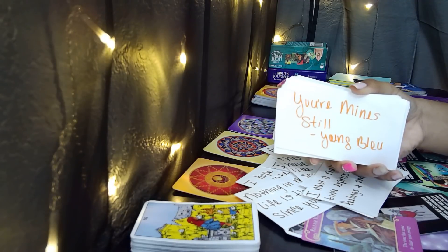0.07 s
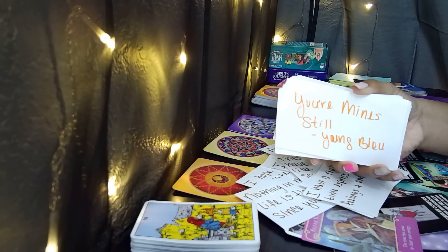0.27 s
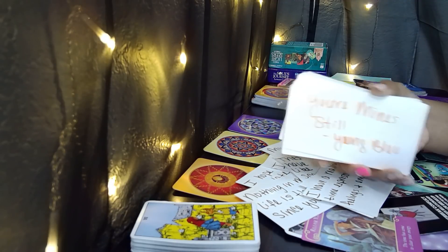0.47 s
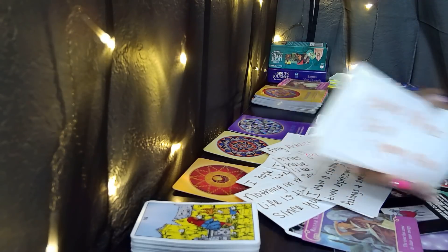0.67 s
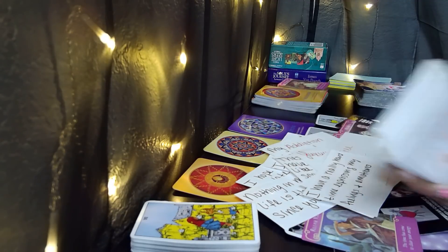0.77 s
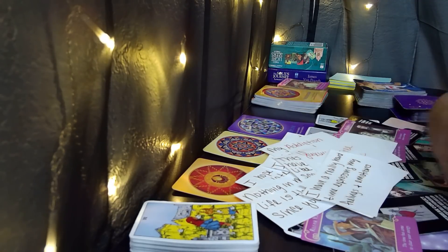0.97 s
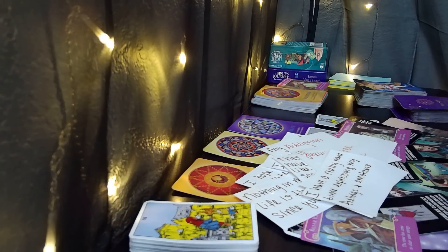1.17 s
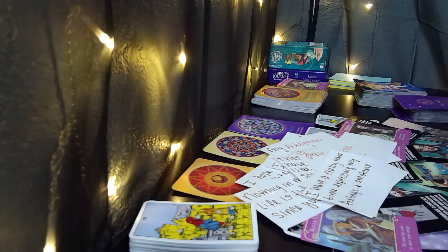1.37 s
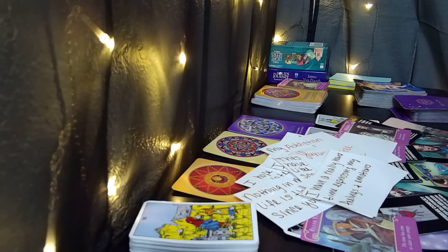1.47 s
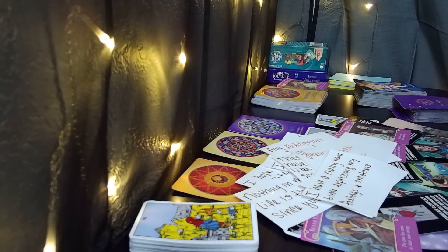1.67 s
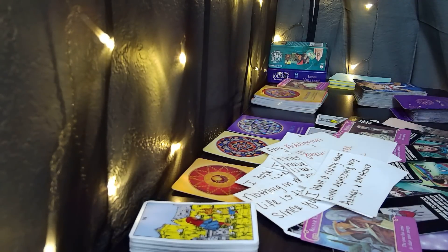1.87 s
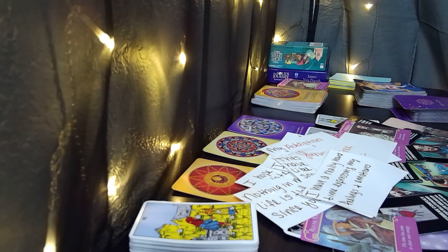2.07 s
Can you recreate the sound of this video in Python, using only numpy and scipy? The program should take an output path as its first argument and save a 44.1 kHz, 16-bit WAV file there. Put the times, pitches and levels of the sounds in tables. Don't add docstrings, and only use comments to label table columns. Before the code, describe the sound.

A stack of stiff cards slaps onto a wooden table with a bright crack and short low thud, after faint paper sliding and small edge ticks; small quiet room with low rumble, close stereo microphones.

```python
import sys
import numpy as np
from scipy import signal
from scipy.fft import rfft, irfft
from scipy.io import wavfile

SR = 44100
rng = np.random.default_rng(int(sys.argv[2]) if len(sys.argv) > 2 else 0)


def wav_record(signal):
    frames = np.transpose(np.atleast_2d(signal))
    bounded = np.clip(frames, -1, 1)
    quanta = np.round(bounded * 32767).astype(np.int16)
    wavfile.write(sys.argv[1], SR, quanta)


def magnitude_from_level(level_db):
    exponent = np.asarray(level_db, float) / 20
    return 10 ** exponent


N = 93403


def at_hz(points, hz):
    p = np.array(points)
    return np.interp(np.log(np.maximum(hz, 1e-3)), np.log(p[:, 0]), p[:, 1])


def in_time(rows):
    return np.interp(np.arange(N) / SR, *np.transpose(rows), left=-120, right=-120)


def rms_one(x):
    return x / np.sqrt(np.mean(x ** 2) + 1e-20)


def shaped(x, gain):
    return irfft(rfft(x) * gain(np.arange(N // 2 + 1) * SR / N), N)


def coloured(x, points):
    hz = np.arange(N // 2 + 1) * SR / N
    cepstrum = irfft(np.log(magnitude_from_level(at_hz(points, hz))), N)
    cepstrum[1:N // 2] *= 2
    cepstrum[N // 2 + 1:] = 0
    return irfft(rfft(x) * np.exp(rfft(cepstrum)), N)


def filtered(x, order, hz, kind="low"):
    return signal.sosfilt(signal.butter(order, hz, kind, fs=SR, output="sos"), x)


def burst(start, t60, rough):
    t = np.arange(N) / SR - start
    fade = magnitude_from_level(-60 * np.clip(t, 0, 0.1) / t60)
    x = (t >= 0) * (t < 0.1) * fade * rough
    return x / np.sqrt(np.sum(x ** 2))


def soft_click(start, cut_hz):
    x = np.zeros(N)
    t = np.arange(64) / SR
    first = int(start * SR)
    x[first:first + 64] = rms_one(t * np.exp(-2 * np.pi * cut_hz * t)) / 8
    return x


def ring(clicks, hz, t60):
    r, w = magnitude_from_level(-60 / (t60 * SR)), 2 * np.pi * hz / SR
    return signal.lfilter([0, np.sin(w)], [1, -2 * r * np.cos(w), r * r], clicks + 1e-18)


# frequency in Hz, correlation from -1 to 1.
MIC_LIKENESS = [(20, 0.89), (130, 0.95), (290, 1), (640, .75), (1400, .35), (3000, -0.5), (7000, 0.32)]


def diffuse(gain):
    def alike(hz):
        return np.clip(at_hz(MIC_LIKENESS, hz), -0.99, 0.99)

    mid, side = rng.standard_normal((2, N))
    mid = shaped(mid, lambda hz: gain(hz) * np.sqrt(1 + alike(hz)))
    side = shaped(side, lambda hz: gain(hz) * np.sqrt(1 - alike(hz)))
    return np.array([mid + side, mid - side])


# frequency in Hz, level in dB per Hz.
AIR_COLOUR = [(4, 2.5), (30, -3.5), (59, -14), (96, -24), (200, -30), (400, -40), (1800, -54.5),
              (2300, -64.5)]
# time in seconds, level in dB.
AIR_SWELL = [(0.0, -43), (0.55, -42.5), (0.66, -31), (1.18, -45.5), (1.3, -54.5), (1.66, -40.5),
             (2.12, -44.5)]
# frequency in Hz, level in dB per Hz.
HISS_COLOUR = [(300, -7), (2000, -1), (5000, -4.5), (12000, -5), (16000, -6)]


def background():
    air_db, swell_share, hiss_db = -36, 0.5, -70.5
    swell = np.interp(np.arange(N) / SR, *np.transpose(AIR_SWELL))
    air = rms_one(diffuse(lambda hz: magnitude_from_level(at_hz(AIR_COLOUR, hz)) * (hz > 3) / (1 + (hz / 2500) ** 4)))
    deep = filtered(air, 2, 60)
    air = air + deep * (magnitude_from_level(swell_share * (swell - swell.mean())) - 1)
    hiss = rms_one(shaped(rng.standard_normal((2, N)), lambda hz: magnitude_from_level(at_hz(HISS_COLOUR, hz))))
    balance = magnitude_from_level(np.array([[-0.5], [0.5]]))
    return magnitude_from_level(air_db) * air * balance + magnitude_from_level(hiss_db) * hiss


# frequency in Hz, t60 in seconds.
ROOM_DECAY = [(100, .35), (500, 0.29), (1500, 0.37), (4000, 0.36), (8000, .17), (14000, .1)]
# frequency in Hz, level in dB per Hz.
ROOM_SPECTRUM = [(60, 12.5), (150, 0.5), (320, 13), (750, 4), (1500, 2), (3200, -3.5), (6000, -16),
                 (10000, -32.5)]


def room():
    room_db, blow_s, build_up_s = -15.5, 1.327, 0.011
    t = np.maximum(np.arange(N) / SR - blow_s, 0)
    noise = diffuse(lambda hz: magnitude_from_level(at_hz(ROOM_SPECTRUM, hz)))
    edges = 70 * 2 ** np.arange(0, 7.6, 0.25)
    tail = 0
    for low, high in zip(edges, edges[1:]):
        band = filtered(noise, 2, [low, high], "band")
        t60 = at_hz(ROOM_DECAY, np.sqrt(low * high))
        tail = tail + band * magnitude_from_level(-60 * t / t60)
    return magnitude_from_level(room_db) * tail * np.clip(t / build_up_s, 0, 1)


# time in seconds, level in dB.
CARD_SLIDE = [(.5, -91.5), (.63, -78.5), (.8, -78.5), (.896, -73.5), (.914, -61.5), (.956, -62.5),
              (1.01, -64), (1.03, -70), (1.3, -77)]
# time in seconds, level in dB.
FINGERS_LEAVE = [(1.45, -67), (1.55, -68.5), (1.75, -71.5), (1.92, -82), (2.0, -95)]
# frequency in Hz, level in dB per Hz.
PAPER_COLOUR = [(900, -11), (1800, 0), (2600, -8.5), (3400, 0), (4500, -3), (5500, -4), (7000, -7.5),
                (12000, -22)]
# start in seconds, peak level in dB, pitch in Hz, t60 in seconds.
EDGE_TICKS = [
    (0.8751, -44.5, 1520, 0.015),
    (0.8794, -57, 1490, .012),
    (.886, -52, 1210, 0.044),
    (1.001, -52, 3600, .012),
    (1.001, -52, 7420, 0.0084),
    (1.9042, -51.5, 4630, 0.029),
    (1.9045, -49, 5500, .02),
    (1.9045, -58.5, 8500, 0.0099),
    (.82, -58, 10000, .008),
]


def handling():
    grains_per_s, trim_db, scattered, left_lag_s = 12000, 2, 0.72, 3.5 / 44100
    grain = (rng.random((3, N)) < grains_per_s / SR) * rng.standard_normal((3, N))
    grain = rms_one(shaped(grain, lambda hz: magnitude_from_level(at_hz(PAPER_COLOUR, hz)) * (hz > 700) * (hz < 12500)))
    grain = grain * (magnitude_from_level(in_time(CARD_SLIDE) + trim_db) + magnitude_from_level(in_time(FINGERS_LEAVE)))
    right = grain[0].copy()
    rough = rng.standard_normal(N)
    for start, db, hz, t60 in EDGE_TICKS:
        tick = filtered(burst(start, t60, rough) + 1e-18, 2, [hz / 1.4, hz * 1.4], "band")
        right += magnitude_from_level(db) * tick / np.abs(tick).max()
    left = magnitude_from_level(-1.5) * shaped(right, lambda hz: np.exp(-2j * np.pi * hz * left_lag_s))
    return np.array([left, right]) + scattered * grain[1:]


# start in seconds, level in dB.
HAND_PUSHES = [
    (1.3137, -14.5),
    (1.324, -8),
    (1.3307, 0),
]
# frequency in Hz, level in dB, t60 in seconds.
TABLE_MODES = [(69, -5.5, 0.22), (96.2, -1.5, .2), (125, -13, .12), (303.8, 4, 0.03), (342, -11, .17),
               (389.5, -11.5, 0.072), (440, -8, 0.058), (550, -6, 0.1), (660, -6.5, .05), (776, -4, .06)]


def table_thud():
    table_db = -17.5 - 10.5
    pushes = sum(magnitude_from_level(db) * soft_click(start, 1500) for start, db in HAND_PUSHES)
    thud = np.zeros(N)
    for k, (hz, db, t60) in enumerate(TABLE_MODES):
        thud += magnitude_from_level(table_db + db) * ring(pushes, hz, t60) * (-1) ** k
    return thud


# start in seconds, level in dB, contact cut-off in Hz.
CARD_CONTACTS = [(1.3130, -18, 6000), (1.3160, -19, 2000), (1.3225, -4.5, 4940), (1.325, -11.5, 4500),
                 (1.326, -2, 7140), (1.3278, -5, 6000), (1.3294, -9.5, 5500), (1.3322, -6, 3998),
                 (1.3337, -10, 3000), (1.3352, -11, 3000), (1.3408, -15, 3000), (1.3452, -18, 3000)]
# frequency in Hz, level in dB.
STACK_MODES = [(1110, -4), (1330, -4.5), (1495, -3), (1667, -1.5), (1941, -2.5), (2520, -9), (2958, -11),
               (3302, 4.5), (3468, -1), (3769, 5), (4661, -8.5)]
# frequency in Hz, level in dB per Hz.
CRACK_SPECTRUM = [(200, -11.5), (700, -2.5), (1500, -2.5), (2400, 1.5), (3500, 4), (5000, 1), (7000, -15),
                  (12000, -30)]


def card_cracks():
    crack_db, stack_db, scatter_db = -6.5 + 21.5, -22.5 + 11, 3
    crackle_t60, stack_t60 = 0.008, 0.03
    rough = rng.standard_normal(N)
    strike = magnitude_from_level(scatter_db * rng.standard_normal((len(CARD_CONTACTS), len(STACK_MODES))))
    cracks = np.array([magnitude_from_level(db) * filtered(burst(start, crackle_t60, rough), 2, cut_hz)
                       for start, db, cut_hz in CARD_CONTACTS])
    out = magnitude_from_level(crack_db) * coloured(cracks.sum(axis=0), CRACK_SPECTRUM)
    for k, (hz, db) in enumerate(STACK_MODES):
        out += magnitude_from_level(stack_db + db) * ring(strike[:, k] @ cracks, hz, stack_t60) * (-1) ** k
    return out


# frequency in Hz, level in dB, phase lag in radians.
LEFT_AGAINST_RIGHT = [(100, 0.5, 0), (1010, -2.5, 0.9), (1895, 3.5, -0.1), (2800, -3, 1.33), (4200, 3.5, 3),
                      (6000, -1, 5), (8000, 3.5, 7.5), (12300, -2.5, 9.0)]


def slap():
    right = filtered(card_cracks() + table_thud(), 3, [35, 12500], "band")
    hz, db, lag = np.transpose(LEFT_AGAINST_RIGHT)
    left = shaped(right, lambda f: magnitude_from_level(np.interp(f, hz, db)) * np.exp(-1j * np.interp(f, hz, lag)))
    return np.array([left, right])


def scene():
    return slap() + handling() + room() + background()


def low_pass(x):
    return signal.sosfilt(signal.butter(12, 15930, fs=SR, output="sos"), x)


def record(dry):
    mix = dry / (1 + np.abs(dry / 1.1) ** 6) ** (1 / 6)
    return low_pass(mix)


dry = scene()
out = record(dry)
wav_record(out)
```